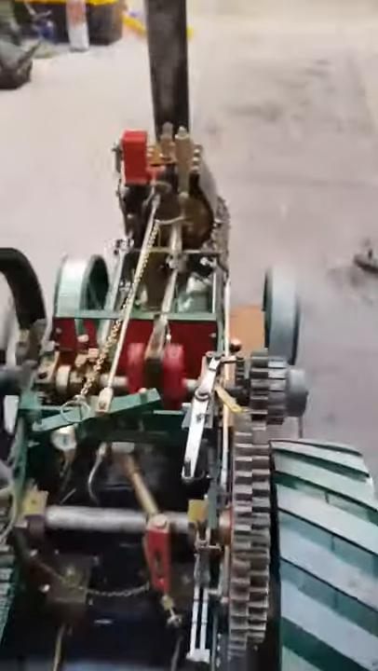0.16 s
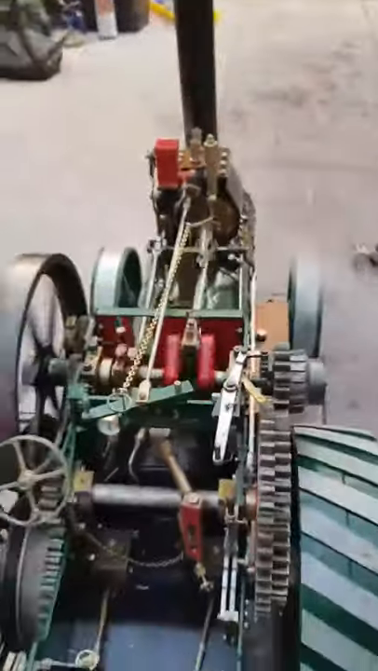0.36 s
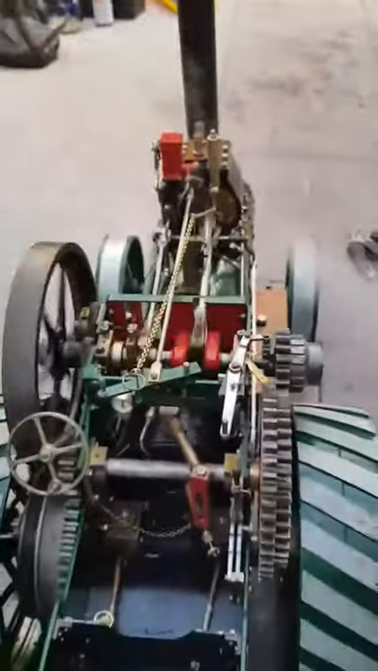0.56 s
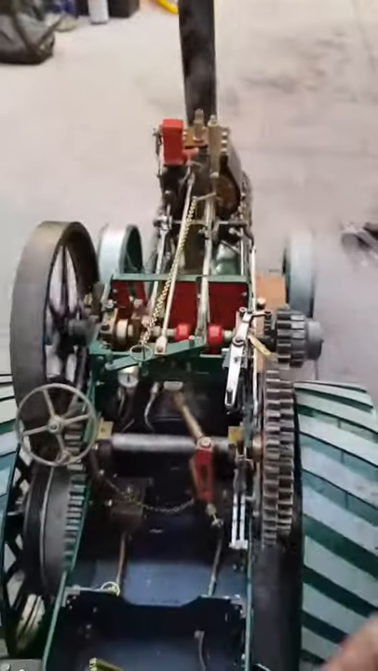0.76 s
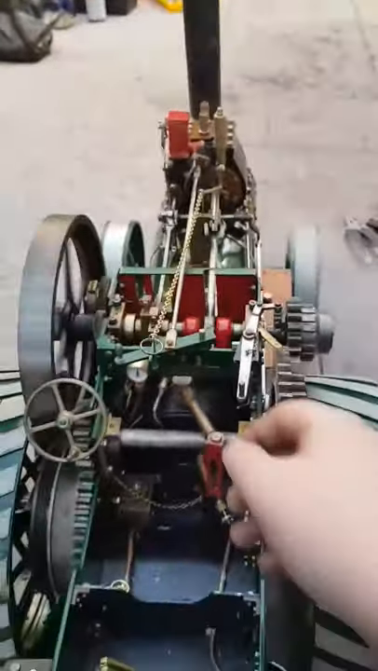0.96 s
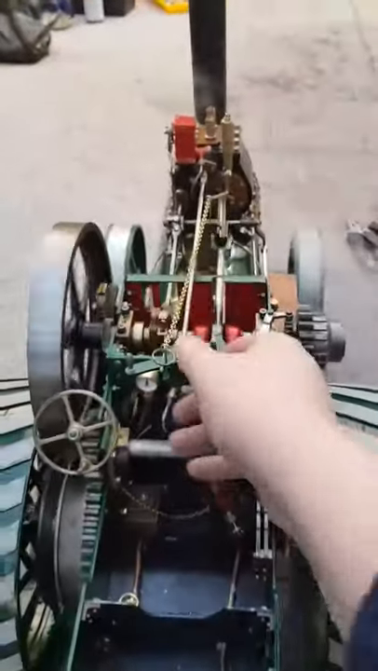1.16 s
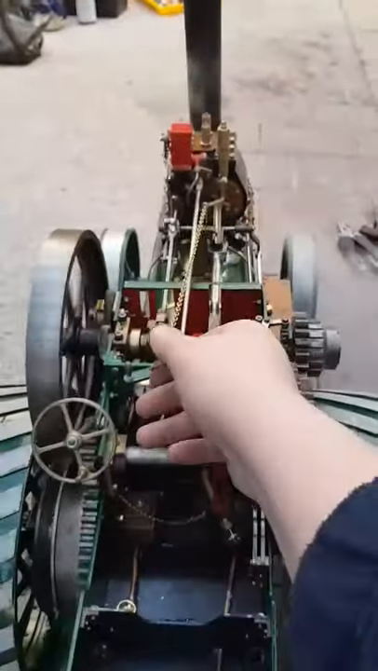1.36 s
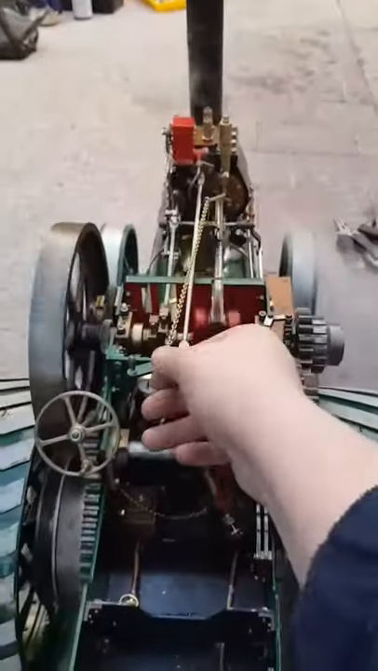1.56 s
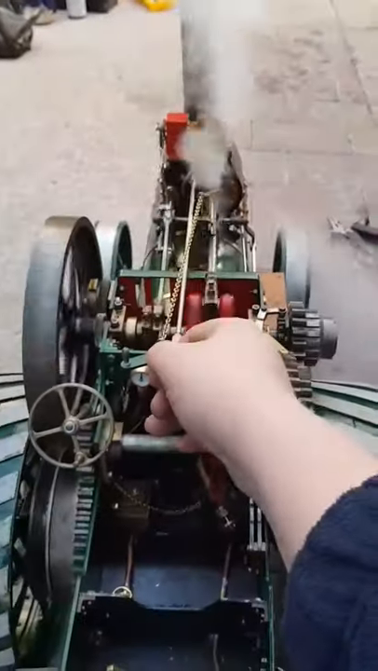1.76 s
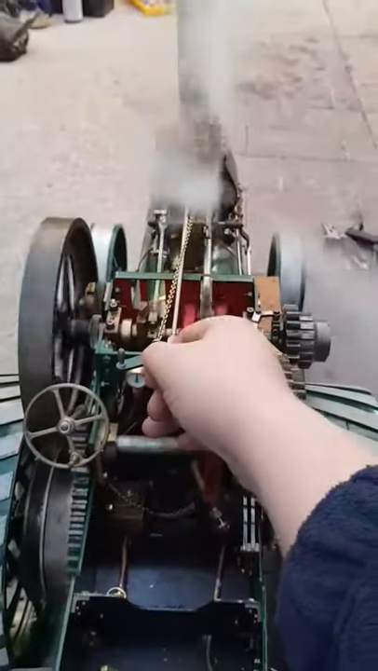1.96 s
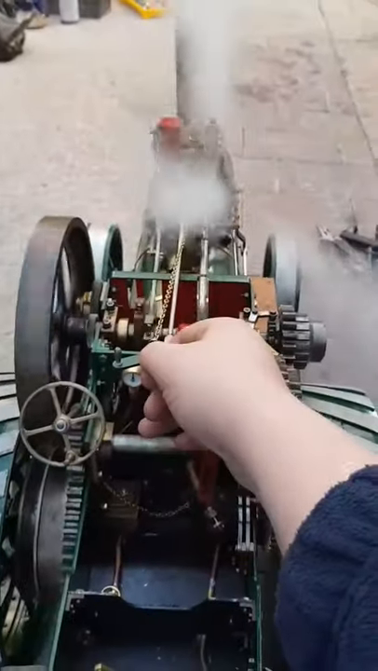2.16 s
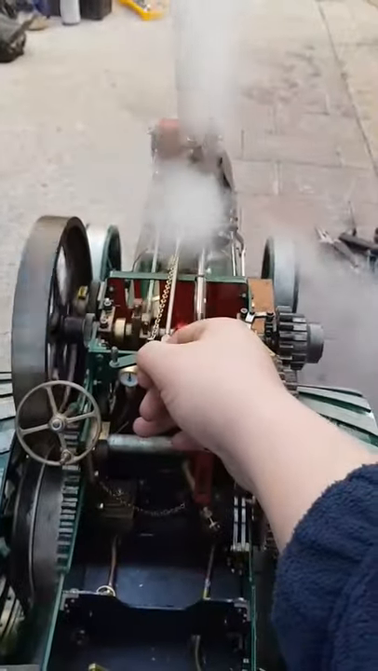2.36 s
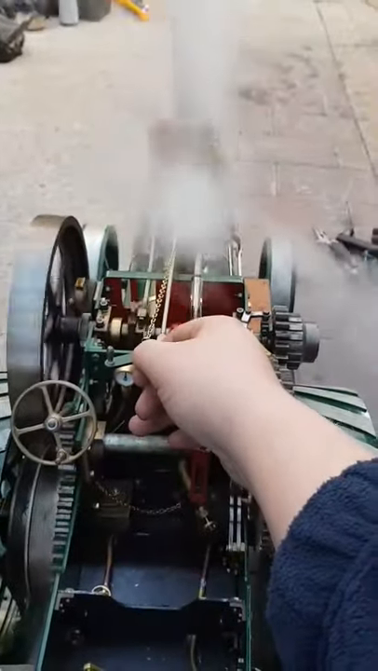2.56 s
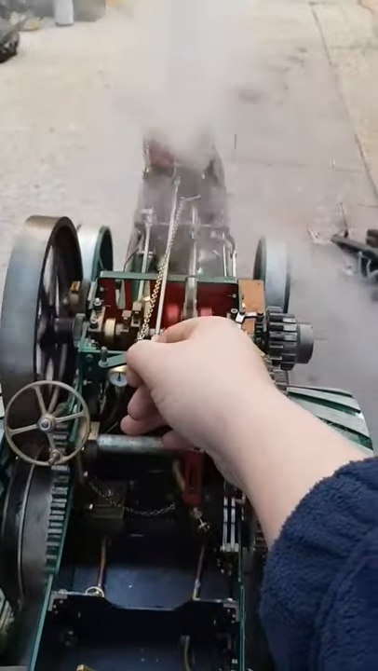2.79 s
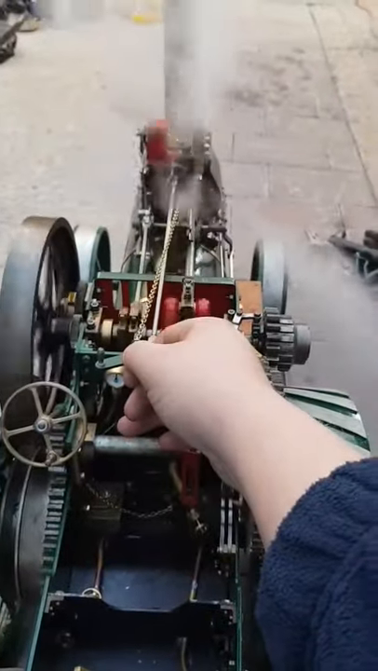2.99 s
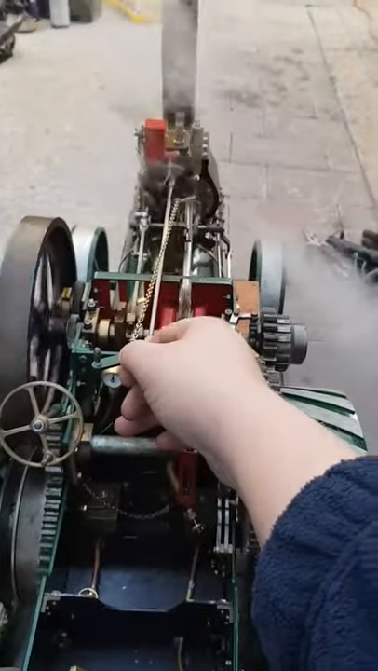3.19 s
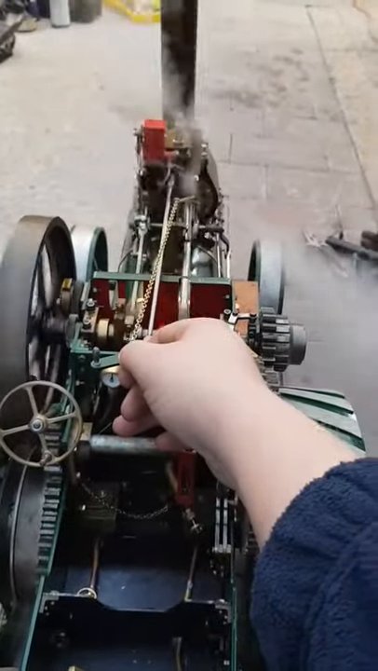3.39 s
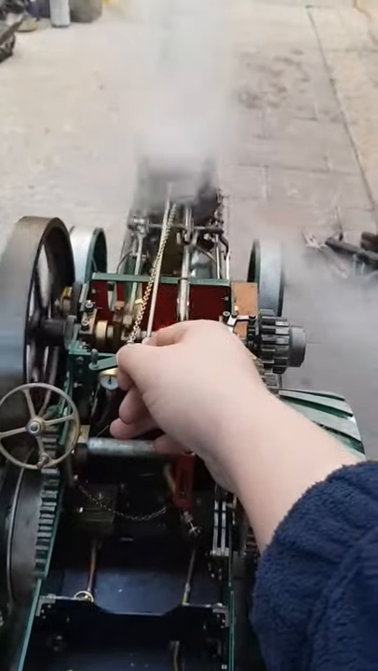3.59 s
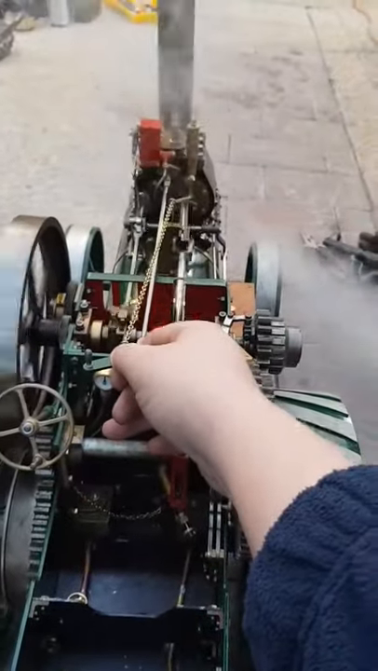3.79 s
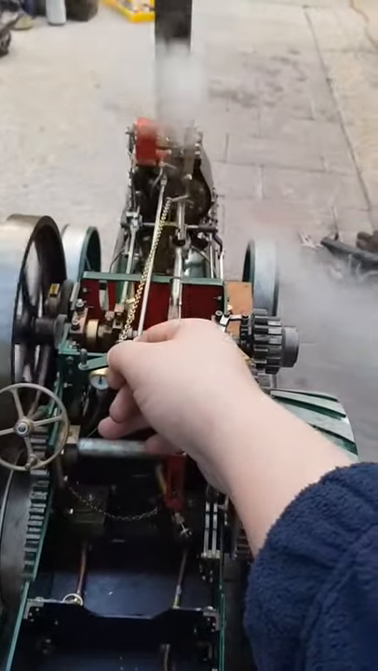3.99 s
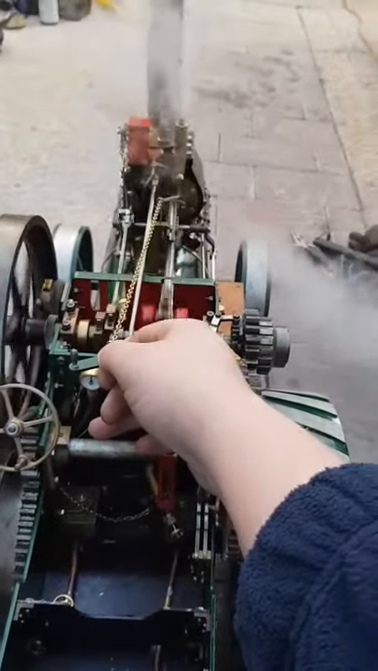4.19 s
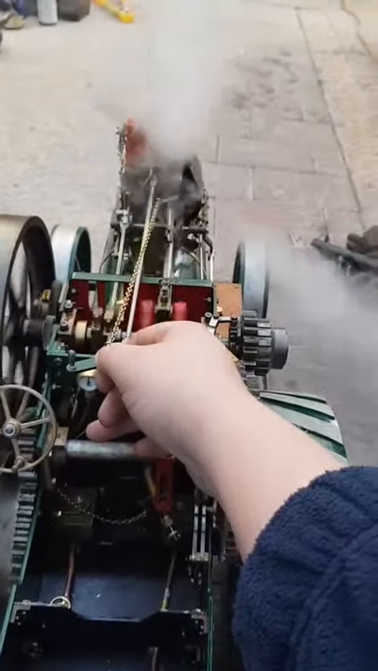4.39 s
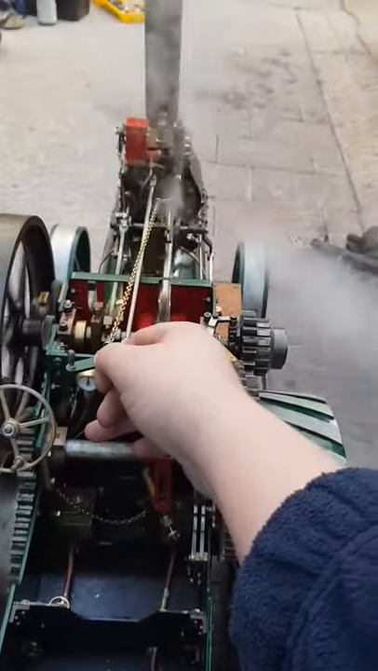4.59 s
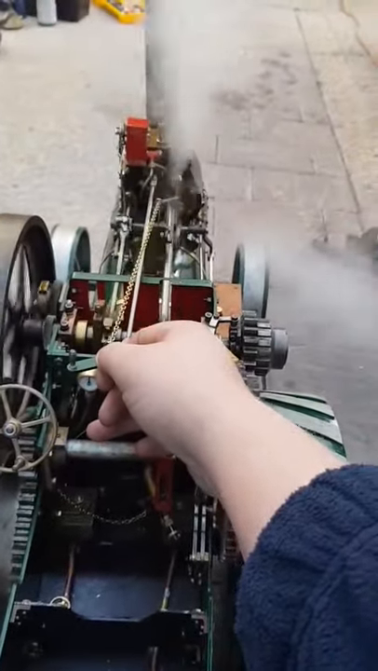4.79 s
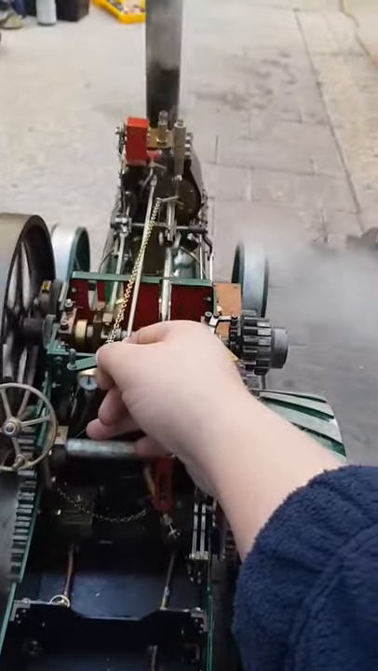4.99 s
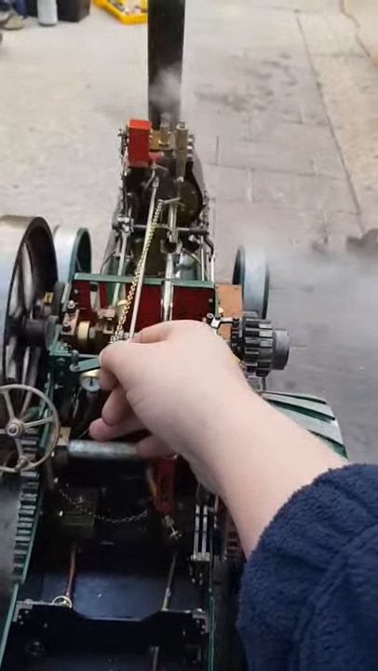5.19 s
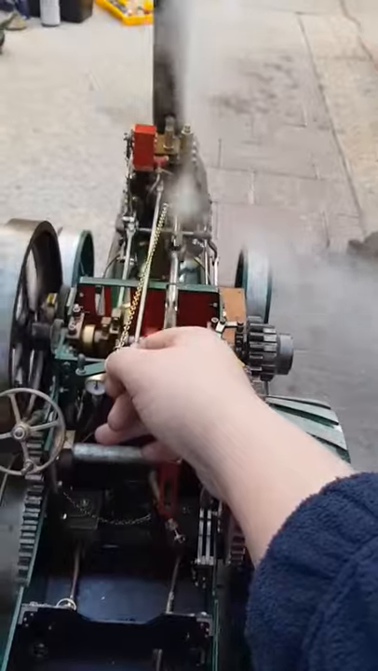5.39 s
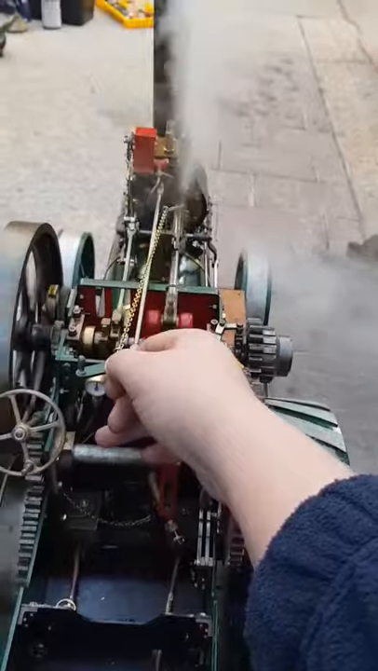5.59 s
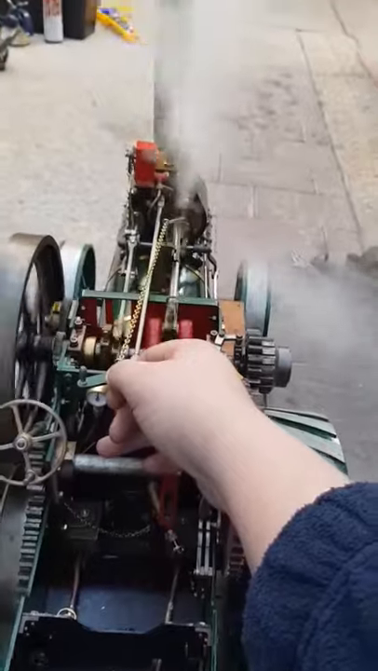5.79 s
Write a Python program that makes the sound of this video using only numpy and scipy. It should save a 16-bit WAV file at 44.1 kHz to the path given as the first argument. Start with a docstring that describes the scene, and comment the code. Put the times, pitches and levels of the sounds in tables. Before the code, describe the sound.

A small steam engine ticks over with fast chuffs and knocks while its wet, high whistle hisses, sputters and briefly rings clean.

```python
"""A workshop floor, close to a model steam traction engine ticking over.
Each crank turn gives two exhaust beats up the chimney, a round of knocks from rod and valve gear
and a spit from a leaking gland. The boiler simmers, a loose chain clinks, slack gear teeth clack.
A hand works the little whistle, which is wet: it mostly hisses and sputters,
and rings clean only twice, when the jet locks to the bell."""
import sys
import numpy as np
from scipy import signal
from scipy.fft import rfft, irfft, next_fast_len
from scipy.io import wavfile
from scipy.ndimage import uniform_filter1d, minimum_filter1d, map_coordinates

SR = 44100
rng = np.random.default_rng(int(sys.argv[2]) if len(sys.argv) > 2 else 0)


def persist_wave(psi):
    """Save psi, clipped to +-1, as 16-bit WAV."""
    counts = np.round(np.clip(psi, -1, 1) * 32767).astype(np.int16)
    wavfile.write(sys.argv[1], SR, np.atleast_2d(counts).T)


N = 257984

# Slow level changes. Each row: time in seconds, then knock, exhaust and chimney ring gains in dB.
ENGINE_GAINS = [(0, 2, 2.5, 4), (.6, 2, 0.1, 1.5), (1.2, 0.5, 0, 2), (1.75, -1, 1.5, -1),
                (2.6, -3.5, -2.2, 4.5), (3.4, -4.5, -4, 5), (4.2, -1, 0.5, 0.5), (5.1, -1, -2.5, 5),
                (5.85, -4.5, -3.5, 0.5)]
# Each row: valve opening, release, creep duration and closing time in seconds, first and last hiss
# gain in dB, full-pressure pitch in Hz, note gain in dB, pure-tone share of the power.
WHISTLE_PULLS = [(1.765, 2.995, 0.036, 0.92, -23, -30.5, 4872, -23.5, 0.64),
                 (3.46, 3.635, 0.057, 0.19, -31.5, -28.5, 4900, -26, 0.6),
                 (4.275, 4.445, 0.55, 0.15, -28, -25, 4885, -22, 0.3),
                 (4.645, 4.87, 0.017, 0.25, -27, -27, 4876, -22.5, 0.87),
                 (5.372, 5.9, 0.38, 0.13, -30.5, -27, 4900, -24.5, 0.58)]


def amp(db):
    """Decibels to gain."""
    return 10 ** (np.asarray(db) / 20)


def unit(x):
    """Scale to rms 1."""
    return x / np.sqrt(np.mean(x ** 2) + 1e-20)


def along(points, hz):
    """Interpolate (Hz, value) points on a log axis."""
    point_hz, values = np.transpose(points)
    return np.interp(np.log(hz + 1), np.log(point_hz), values)


def clock():
    """Sample times in seconds."""
    return np.arange(N) / SR


def curves(rows):
    """One value per sample for each column after the time."""
    times, *columns = np.transpose(rows)
    return [np.interp(clock(), times, column) for column in columns]


def wobble(rate_hz):
    """Smooth random curve with rate_hz knots a second."""
    return map_coordinates(rng.standard_normal(int(N * rate_hz / SR) + 4), [clock() * rate_hz])


def ramp(start_s, length_s):
    """Linear rise from 0 to 1."""
    return np.clip((clock() - start_s) / length_s, 0, 1)


def swell(t, half_s):
    """Gaussian rise and fall around t = 0."""
    return np.exp(-(t / half_s) ** 2)


def struck(t, peak_s, steep=1.54):
    """Rise to 1 at peak_s after a blow, then decay."""
    u = np.maximum(t, 0) / peak_s
    return (u * np.exp(1 - u)) ** steep


def push(t, hz):
    """Smooth pressure pulse with an undershoot on each side."""
    u = (np.pi * hz * t) ** 2
    return (1 - 2 * u) * np.exp(-u)


def spin(hz):
    """Complex tone that follows a pitch curve."""
    return np.exp(2j * np.pi * np.cumsum(hz) / SR)


def train(events, shape):
    """Add shape(time since the event) at each (seconds, gain)."""
    out = np.zeros(N)
    for s, gain in events:
        near = np.arange(max(int(s * SR) - SR // 20, 0), min(int(s * SR) + SR // 4, N))
        out[near] += gain * shape(near / SR - s)
    return out


def filtered(x, response):
    """Apply a complex response, given as a function of Hz."""
    size = next_fast_len(N + SR // 2)
    return irfft(rfft(x, size) * response(np.fft.rfftfreq(size, 1 / SR)), size)[..., :N]


def resonate(x, modes):
    """Resonators (centre Hz, width Hz, relative dB); white noise keeps its power."""
    def response(f):
        h = sum(amp(db) * 1j * f * bw / (hz * hz - f * f + 1j * f * bw) for hz, bw, db in modes)
        return h / np.sqrt(np.mean(abs(h) ** 2))
    return filtered(x, response)


def noise(spectrum=((1, 0),)):
    """Stereo noise of rms 1, alike on both sides only in the bass."""
    # Each row: frequency in Hz, left-right correlation.
    coherence = [(40, .6), (80, .65), (150, .88), (300, .75), (600, .55), (1100, .05), (4000, 0),
                 (12000, -.1)]

    def response(f):
        angle = np.arccos(np.clip(along(coherence, f), -1, 1)) / 2
        return amp(along(spectrum, f)) * [np.cos(angle), np.sin(angle)]
    mid, side = filtered(rng.standard_normal((2, N)), response)
    return unit(np.array([mid + side, mid - side]))


def pan(left_db):
    """Channel gains, the left above the right by left_db."""
    return amp([[left_db / 2], [-left_db / 2]])


def stereo_tone(tone, left_db, lag_cycles):
    """Pan a complex tone and delay its right side."""
    pair = np.array([tone, tone * np.exp(-2j * np.pi * lag_cycles)]).real
    return np.sqrt(2) * unit(pan(left_db)) * pair


def room(x, wet_db):
    """Add the workshop's reverberation, different on each side."""
    # Each row: frequency in Hz, time to fall 60 dB in seconds.
    t60_s = [(150, 0.11), (1000, 0.6), (5000, 0.37), (13000, 0.012)]
    hz, t, spectra = signal.stft(rng.standard_normal((2, SR // 2)), SR, nperseg=256)
    tail = signal.istft(spectra * amp(-60 * t / along(t60_s, hz)[:, None]), SR, nperseg=256)[1]
    tail /= np.linalg.norm(tail[0])
    return x + amp(wet_db) * signal.fftconvolve(np.atleast_2d(x), tail, axes=1)[:, :N]


def crank(phase_turns, scatter_db, dead_centre_s=.0374):
    """(seconds, gain) of an event that comes once a turn of the almost even crank."""
    # Each row: time in seconds, turns per second.
    speed = [(0, 5.67), (1.6, 5.7036), (2.7, 5.6488), (3.9, 5.7643), (5.85, 5.7239)]
    t = np.arange(-SR // 2, N + SR // 4) / SR
    turns = np.cumsum(np.interp(t, *np.transpose(speed))) / SR
    turns -= np.interp(dead_centre_s, t, turns)
    times = np.interp(np.arange(-1, int(turns[-1])) + phase_turns, turns, t)
    return zip(times, amp(scatter_db * rng.standard_normal(len(times))))


def simmer(gain_db=-34, unrest_db=1, low_cut_hz=36):
    """Fire, boiler and running gears make a bed of noise."""
    # Each row: frequency in Hz, relative density in dB.
    spectrum = [(15, -47), (25, -11), (75, -10.5), (160, -4), (349, -5.5), (579, -3.5), (679, -3.5),
                (854, -4), (1150, -12), (1450, -7), (1910, -17.5), (2340, -14), (2630, -8.5), (2950, -14.5),
                (3160, -27), (6000, -9), (7800, -40), (13200, -120)]
    bed = filtered(noise(spectrum), lambda f: f ** 2 / (f ** 2 + low_cut_hz ** 2))
    _, exhaust_db, _ = curves(ENGINE_GAINS)
    return amp(gain_db + unrest_db * wobble(16) + exhaust_db) * bed


def chain(clinks_per_s=160, decay_s=.0015, gain_db=-38, tug_db=3):
    """Loose links clink at random, hardest just after the main exhaust beat."""
    # Each row: frequency in Hz, relative density in dB.
    spectrum = [(200, -70), (700, -29), (1100, 4), (2000, -15), (3200, 0), (4800, 4.5), (7000, -15),
                (12000, -8.5)]
    hits = (rng.random(N) < clinks_per_s / SR) * rng.uniform(.84, 1, N)
    decay = np.exp(-np.arange(SR // 100) / (decay_s * SR))
    tug = 1 + amp(tug_db) * train(crank(.086, scatter_db=2.5), lambda t: swell(t, half_s=.004))
    clinks = unit(signal.fftconvolve(hits, decay)[:N] * tug * noise(spectrum))
    knock_db, _, _ = curves(ENGINE_GAINS)
    return room(amp(gain_db + knock_db) * clinks, wet_db=-2.5)


def gear_teeth(peak_s=.0019, gain_db=1):
    """Slack teeth meet now and then with a sharp clack."""
    # Each row: start in seconds, gain in dB.
    clacks = [(.05, -30), (.565, -25.5), (0.585, -24), (.667, -40), (0.836, -37), (1.2, -37), (1.272, -25),
              (1.29, -25), (1.446, -32)]
    # Each row: frequency in Hz, relative density in dB.
    spectrum = [(500, -30), (1500, -27), (2500, 3), (4500, 9), (6500, -23), (13000, -23)]
    blows = train([(s, amp(db + gain_db)) for s, db in clacks], lambda t: struck(t, peak_s, steep=.43))
    return room(blows * noise(spectrum), wet_db=-5)


def gland(peak_turns=.21, half_s=.071, idle_db=-4, ragged_db=.94):
    """The piston gland leaks raggedly, most while its end of the cylinder is under steam."""
    # Each row: time in seconds, gain in dB.
    leak = [(0, -20), (.6, -20.5), (.85, -21), (1.2, -22), (1.48, -20.5), (1.7, -23.5), (3.3, -27.5),
            (5.85, -22.5)]
    # Each row: frequency in Hz, relative density in dB.
    spectrum = [(400, -80), (1500, -41), (3000, -27), (4800, -14), (7000, -4.5), (8500, -8), (10000, -3),
                (11500, 2), (13000, 3)]
    pressure = train(crank(peak_turns, scatter_db=.7), lambda t: np.exp(-(t / half_s) ** 4))
    flow = amp(idle_db) + (1 - amp(idle_db)) * pressure
    return amp(curves(leak)[0] + ragged_db * wobble(60)) * flow * noise(spectrum) * pan(left_db=6)


def crosshead(thud_hz=175, peak_s=.0037):
    """The crosshead thuds softly after each exhaust beat."""
    # Each row: crank phase in turns, gain in dB.
    strokes = [(.19, -40.5), (.65, -33.5)]
    thud = lambda t: struck(t + peak_s, peak_s) * np.sin(2 * np.pi * thud_hz * t)
    thuds = sum(amp(db) * train(crank(phase, scatter_db=2.5), thud) for phase, db in strokes)
    _, exhaust_db, _ = curves(ENGINE_GAINS)
    return amp(exhaust_db) * thuds


def knocks(detune=.024, hard_second_hz=830, hard_peak_s=.0072):
    """Every knock as (start s, gain, main Hz, second Hz, rise s); hard ones displace regular ones."""
    # Each row: crank phase in turns, gain in dB, main and second mode in Hz, rise in seconds.
    per_turn = [(.075, -27, 653, 847, 0.0073), (0.155, -31, 682, 1020, 0.0039),
                (.312, -28, 693, 808, 0.0083), (.57, -32, 681, 470, 0.0055), (.79, -28.5, 689, 876, 0.0077)]
    # Each row: start in seconds, gain in dB, main mode in Hz.
    hard_knocks = [(.05, -21.5, 634), (.095, -22, 712), (.231, -24, 667), (.352, -25.5, 700),
                   (.402, -24, 631), (.447, -24.5, 730), (.533, -25, 694), (.584, -26, 639),
                   (.621, -24, 680), (.757, -28, 650), (.793, -24, 683), (.928, -23.5, 634),
                   (.974, -23.5, 703), (1.108, -23, 680), (1.497, -22, 690), (1.64, -22, 677),
                   (1.669, -25, 718), (1.811, -23, 647), (1.851, -23, 705), (1.986, -23, 652),
                   (2.203, -25, 717), (3.955, -22.5, 692), (4.127, -25.5, 738), (4.269, -22.5, 657),
                   (4.479, -24.5, 690), (4.823, -24.5, 696), (4.959, -25.5, 645), (5.351, -23, 702)]
    regular = [(s, gain * amp(db), hz * (1 + detune * rng.standard_normal()), second_hz, peak_s)
               for phase, db, hz, second_hz, peak_s in per_turn
               for s, gain in crank(phase, scatter_db=1.5)]
    hard = [(s, amp(db), hz, hard_second_hz, hard_peak_s) for s, db, hz in hard_knocks]
    is_clear = lambda s: all(abs(s - hard_s) > .012 for hard_s, _, _ in hard_knocks)
    return [row for row in regular if is_clear(row[0])] + hard


def motion(ring_db=.3, second_db=-11, grind_db=-9, clunk_db=7, left_lag_s=.00023):
    """Rod and valve gear take up play: two hollow modes and a grind per knock. The bearings clunk."""
    # Boiler and horn plates. Each row: centre and width in Hz, relative gain in dB.
    frame_modes = [(539, 10, 6), (590, 86, -2), (652, 17, -11), (683, 30, -14), (825, 19, -7.5),
                   (921, 44, 4.5), (1002, 60, 5), (1656, 72, 3.5)]
    # Crank bearings, same columns.
    bearing_modes = [(296, 17, 6.5), (387, 60, 0), (535, 62, 6.5)]
    # Each row: crank phase in turns, gain in dB.
    bearing_taps = [(0.085, -36), (0.198, -32.5), (0.571, -33), (0.681, -38)]
    ring, grind, taps = np.zeros((3, N))
    tap = lambda t: np.exp(-(t * SR / 4) ** 2)
    mode = lambda t, hz: np.sin(2 * np.pi * (hz * t + rng.random()))
    for s, gain, main_hz, second_hz, peak_s in knocks():
        blow = [(s, gain)]
        ring += train(blow, lambda t: struck(t, peak_s, steep=2.1) * mode(t, main_hz))
        ring += amp(second_db) * train(blow, lambda t: struck(t, .76 * peak_s) * mode(t, second_hz))
        grind += train(blow, lambda t: struck(t, .87 * peak_s))
    for phase, db in bearing_taps:
        taps += amp(db + clunk_db) * train(crank(phase, scatter_db=1), tap)
    frame = amp(grind_db) * resonate(grind * noise(), frame_modes)
    body = amp(ring_db) * ring + frame + resonate(taps, bearing_modes)
    body = filtered(body, lambda f: np.exp(np.outer([-1j, 1j], np.pi * f * left_lag_s)))
    knock_db, _, _ = curves(ENGINE_GAINS)
    return room(amp(knock_db) * body, wet_db=-12) * pan(left_db=4)


def exhaust(rise_s=.0042, chuff_fall_s=.055, chuff_lag_s=.00099, pipe_db=-3.5, rough_db=1.5,
            boom_lag_s=.0019, flutter_db=-14, flutter_fall_s=.064):
    """Each push of steam booms in the smokebox and rings the chimney; wet steam roughens the chuff."""
    # Each row: crank phase in turns, thump and chuff gain in dB.
    per_turn = [(-.024, -32, -28.5), (0.464, -35.5, -32.5)]
    # Each row: time in seconds, change to that chuff in dB.
    accents = [(.04, -2), (.57, -2.5), (1.795, 2), (2.15, 4.5), (3.21, 3.5), (3.38, 1), (4.6, 1), (4.78, 3),
               (4.95, 2), (5.295, 4)]
    # Each row: frequency in Hz, gain in dB, rise in seconds.
    smokebox_modes = [(86.4, -5, 0.0099), (149.1, -1, 0.0084), (175.2, 0.5, 0.0079)]
    # Each row: centre and width in Hz, relative gain in dB.
    chimney_modes = [(658, 70, -3.5), (1451.5, 39, 5.5), (2072, 30, 0.5), (2357, 20, 2), (2935, 39, 2.5),
                     (3410, 75, -0.5)]
    # Each row: frequency in Hz, relative density in dB.
    rush_spectrum = [(40, -40), (150, -25), (400, -8), (900, 12), (1200, 1.5), (1850, 7.5), (2600, 5),
                     (4000, 9), (5500, 6.5), (8000, 1.5), (13000, -6)]
    thumps, blast, swirl = np.zeros((3, N))
    _, exhaust_db, ring_db = curves(ENGINE_GAINS)
    puff = lambda t, fall_s: np.exp(-np.maximum(t, 0) / fall_s) * (1 + np.tanh(t / rise_s)) / 2
    accent = lambda s: amp(sum(db for at_s, db in accents if abs(s - at_s) < .03))

    def boom(t):
        return -sum(amp(db) * struck(t, peak_s) * np.sin(2 * np.pi * hz * (t - boom_lag_s))
                    for hz, db, peak_s in smokebox_modes)

    for phase, thump_db, chuff_db in per_turn:
        beats = list(crank(phase, scatter_db=1.3))
        accented = [(s, gain * accent(s)) for s, gain in beats]
        thumps += amp(thump_db) * train(beats, boom)
        blast += amp(chuff_db) * train(accented, lambda t: puff(t - chuff_lag_s, chuff_fall_s))
        swirl += amp(thump_db) * train(beats, lambda t: puff(t, flutter_fall_s))
    pipe = amp(pipe_db + ring_db) * resonate(blast * noise(), chimney_modes)
    rush = blast * amp(rough_db * wobble(350)) * noise(rush_spectrum)
    flutter_modes = [(hz, 1 / (np.pi * peak_s), db) for hz, db, peak_s in smokebox_modes]
    flutter = resonate(amp(flutter_db) * swirl * noise(), flutter_modes)
    return amp(exhaust_db) * (thumps + flutter + (pipe + rush) * pan(left_db=2.5))


def lever():
    """The hand lands on the whistle lever with a soft bump."""
    # Each row: time in seconds, gain in dB, centre frequency in Hz.
    bumps = [(1.367, -25, 232), (1.3783, -18.5, 232), (1.383, -22, 199), (1.392, -21.5, 130),
             (1.42, -30, 54.6)]
    return room(sum(amp(db) * push(clock() - s, hz) for s, db, hz in bumps), wet_db=-7)


def jet(gain_db=6, snap_s=.036, creep_db=(-14, -1), closing_db=-22, spit_db=1.3):
    """Steam hisses from the whistle, rough with drops; the valve creeps, snaps open, holds, closes."""
    # Each row: frequency in Hz, relative density in dB.
    spectrum = [(400, -95), (1500, -7.5), (3000, -34), (4300, 0.5), (5500, -4), (7000, -4), (8500, -5),
                (10000, 0.5), (11500, 2.5), (13000, -0.5)]
    t, flow = clock(), np.zeros(N)
    for open_s, release_s, creep_s, closing_s, first_db, last_db, *_ in WHISTLE_PULLS:
        held_db = np.interp(t, [open_s, release_s], [first_db, last_db])
        ajar_db = np.interp(t, [open_s - creep_s, open_s], creep_db) * (1 - ramp(open_s, snap_s))
        fade_db = closing_db * np.maximum(t - release_s, 0) / closing_s
        flow = np.maximum(flow, ramp(open_s - creep_s, snap_s) * amp(held_db + ajar_db + fade_db))
    return flow * amp(gain_db + spit_db * wobble(300)) * noise(spectrum) * pan(left_db=4)


def bell(fill_s=.035, empty_s=.053, flat_hz=175, hang_share=.12, fade_db_per_s=200,
         clear_s=.32, cold_db=-9.5, cold_flat_hz=55.4):
    """Pitch, level and purity of the whistle bell follow each pull; low pressure flattens the note."""
    t = clock()
    pressure, level, purity, full_hz = np.zeros((4, N))
    for open_s, release_s, _, closing_s, _, _, hz, note_db, pure_share in WHISTLE_PULLS:
        filled = ramp(open_s, fill_s)
        held = filled * (1 - ramp(release_s, empty_s))
        pressure += held
        purity += pure_share * held
        full_hz[t >= open_s] = hz
        fading_s = np.maximum(t - release_s - hang_share * closing_s, 0)
        level += filled * amp(note_db - fade_db_per_s * fading_s)
    # On the first pull the cold bell is full of water: weak, flat and toneless until it clears.
    cold = 1 - ramp(WHISTLE_PULLS[0][0], clear_s) ** 2
    pitch_hz = full_hz - flat_hz * (1 - pressure) - cold_flat_hz * cold
    return pitch_hz, level * amp(cold_db * cold), np.clip(purity * (1 - cold), 0, 1)


def clean_note(rows, gain_db, left_db, edge_s=.014, tremble_db=.6, tremble_hz=4):
    """The locked jet sounds a pure, trembling note. Returns the note and the lock, 0 to 1."""
    pitch_hz, db, lag_cycles = curves(rows)
    lock = ramp(rows[0][0] - edge_s / 2, edge_s) * (1 - ramp(rows[-1][0] - edge_s / 2, edge_s))
    level = lock * amp(db + gain_db + tremble_db * wobble(170))
    tone = spin(pitch_hz + tremble_hz * wobble(120))
    return stereo_tone(level * tone, left_db, lag_cycles), lock


def sputters():
    """The note breaks into short peeps, mostly as the valve opens or shuts."""
    # Each row: time and half length in seconds, pitch in Hz, gain in dB, left minus right in dB,
    # right lag in cycles.
    peeps = [(2.1, .008, 4805, -17, 10, .3), (2.115, .004, 4730, -13, 10, -.1),
             (2.134, .004, 4850, -13, 10, .2), (3.035, .012, 4705, -16.5, 3, 0),
             (3.051, .004, 4682, -20, -3, -.1), (3.485, .008, 4855, -16.5, 3, -.1),
             (4.286, .005, 4715, -14.5, 9, 0), (4.301, .006, 4860, -10, 2, -.2),
             (4.315, .005, 4870, -15, 0, .5), (4.338, .004, 4840, -18.5, 2, -.1),
             (4.487, .003, 4722, -18, 7, 0), (4.496, .003, 4720, -17, -3, .2),
             (4.875, .007, 4776, -11.5, 7, .4), (4.891, .004, 4782, -14.5, 5, 0),
             (4.903, .006, 4769, -12.5, 10, .35), (4.925, .004, 4714, -11.5, 5, -.1),
             (5.385, .007, 4740, -13.5, 9, .2), (5.406, .0065, 4846, -8, 10, -.2),
             (5.427, .005, 4853, -13, 7, .3), (5.438, .005, 4841, -15.5, 6, .2)]
    tone = spin(curves(peeps)[1])
    return sum(stereo_tone(train([(s, amp(db))], lambda t: swell(t, half_s)) * tone, left_db, lag)
               for s, half_s, _, db, left_db, lag in peeps)


def whistle(width_hz=50, lip_width_hz=260, lip_db=-6, lip_below_hz=170,
            waver_hz=24, rough_db=2, wet_note_db=-2, duck_db=-3):
    """The wet bell sounds a rough tone in narrow noise; twice the jet locks and it rings clean."""
    # Locked notes. Each row: time in seconds, pitch in Hz, gain in dB, right lag in cycles.
    long_rows = [(2.14, 4885, -12, .45), (2.152, 4905, -9.5, .6), (2.185, 4905, -12.5, .55),
                 (2.21, 4895, -17, .5), (2.25, 4925, -12, .85), (2.277, 4912, -21, .6),
                 (2.305, 4888, -9.5, .48), (2.335, 4880, -13, .38), (2.358, 4872, -9.5, .26),
                 (2.392, 4852, -12.5, .08), (2.42, 4866, -8.7, .08), (2.465, 4877, -10, .28),
                 (2.505, 4866, -11, .45), (2.555, 4850, -15.5, .05), (2.595, 4866, -18, .3),
                 (2.625, 4866, -14.5, .25), (2.665, 4860, -22, .3)]
    short_rows = [(4.785, 4870, -26, 0), (4.803, 4865, -16.5, 0), (4.843, 4850, -17, 0),
                  (4.863, 4810, -19, .3)]
    pitch_hz, level, purity = bell()
    long_note, long_lock = clean_note(long_rows, gain_db=0, left_db=7.5)
    short_note, short_lock = clean_note(short_rows, gain_db=-.5, left_db=-1)
    level *= amp(wet_note_db + rough_db * wobble(180) + duck_db * (long_lock + short_lock))
    carrier = spin(pitch_hz + waver_hz * wobble(70))

    def band(half_width_hz, order):
        lowpass = lambda f: 1 / (1 + (f / half_width_hz) ** order)
        real, imag = filtered(rng.standard_normal((2, 2, N)), lowpass)
        return (unit(real) + 1j * unit(imag)) * carrier

    airy = band(width_hz, order=2).real
    shift_down = np.exp(-2j * np.pi * lip_below_hz * clock())
    lip = amp(lip_db) * (band(lip_width_hz, order=4) * shift_down).real
    tone = stereo_tone(np.sqrt(purity) * carrier, left_db=6, lag_cycles=.25 + .094 * wobble(25))
    breath = np.sqrt(1 - purity) * (airy + lip) * pan(left_db=-1.5)
    return room(level * (tone + breath) + long_note + short_note + sputters(), wet_db=-17)


def scene():
    """Engine, whistle and hand over the simmering bed."""
    engine = exhaust() + motion() + crosshead() + gear_teeth() + chain() + gland()
    return engine + jet() + whistle() + lever() + simmer()


def limit(x, ceiling=.92, window_samples=SR // 100):
    """Turn the gain down smoothly around peaks above the ceiling."""
    needed = np.minimum(1, ceiling / (abs(x).max(axis=0) + 1e-9))
    return x * uniform_filter1d(minimum_filter1d(needed, 2 * window_samples), window_samples)


def record(dry):
    """Each microphone has its own colour; peaks are limited and the top treble is cut."""
    # Each row: frequency in Hz, left minus right in dB.
    balance = [(60, 2), (200, .5), (1500, -1.5), (2200, 1.5), (3000, -.5), (4900, 0), (5800, -4.5),
               (7800, 5), (10000, 1.5), (13000, -4.5)]
    top_hz = 13080
    coloured = filtered(dry, lambda hz: amp(np.outer([.5, -.5], along(balance, hz))))
    return filtered(limit(coloured), lambda hz: hz < top_hz)


dry = scene()
out = record(dry)
persist_wave(out)
```